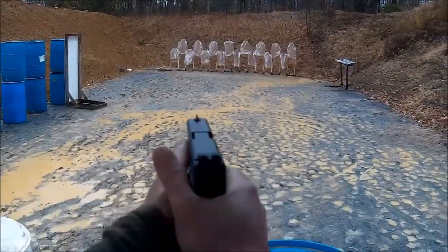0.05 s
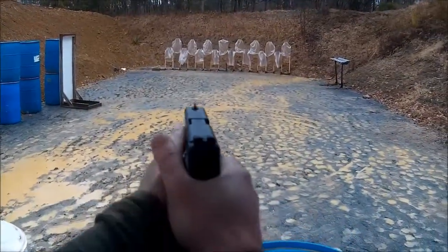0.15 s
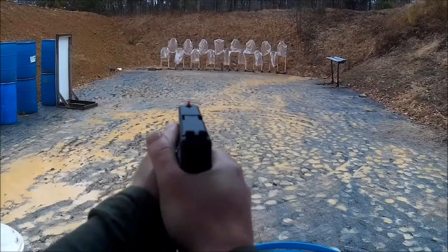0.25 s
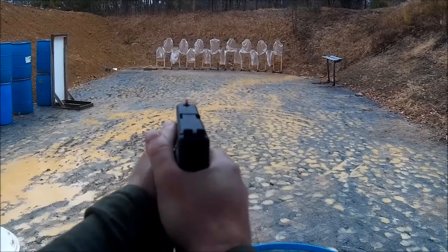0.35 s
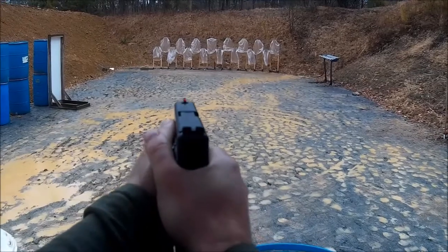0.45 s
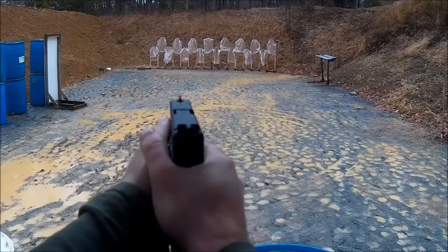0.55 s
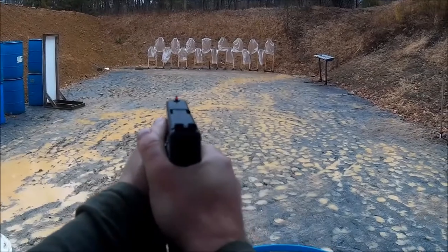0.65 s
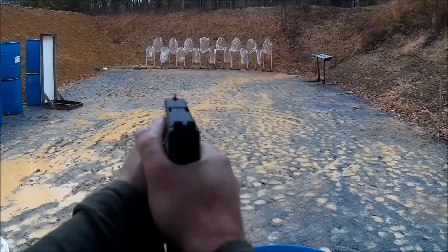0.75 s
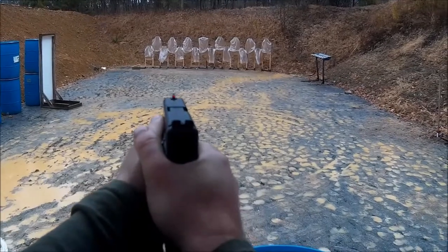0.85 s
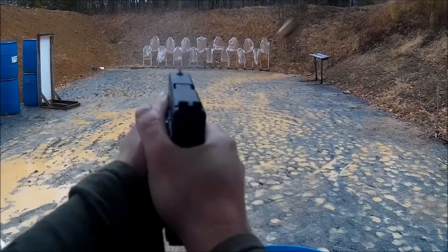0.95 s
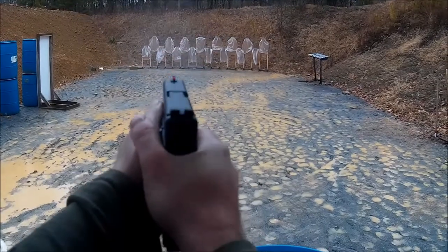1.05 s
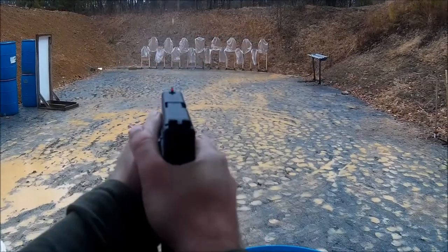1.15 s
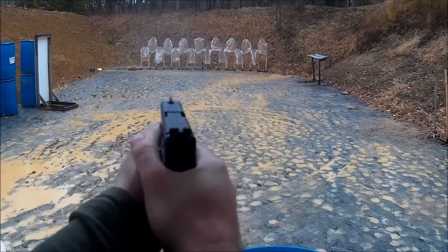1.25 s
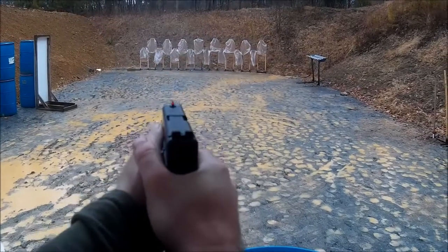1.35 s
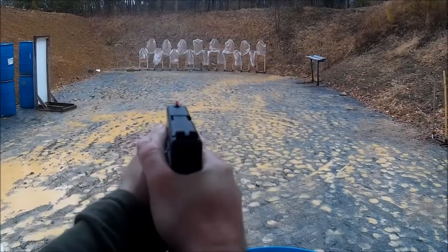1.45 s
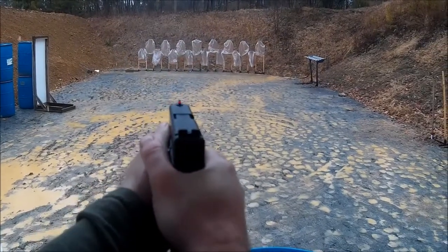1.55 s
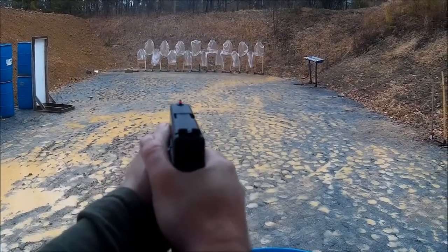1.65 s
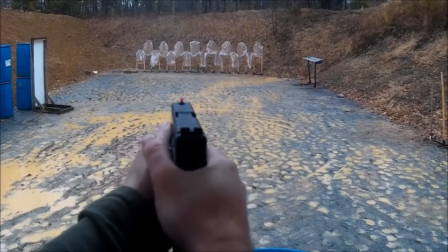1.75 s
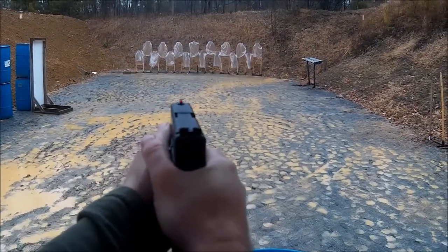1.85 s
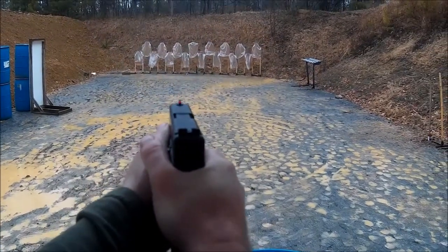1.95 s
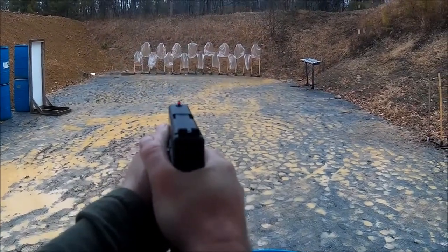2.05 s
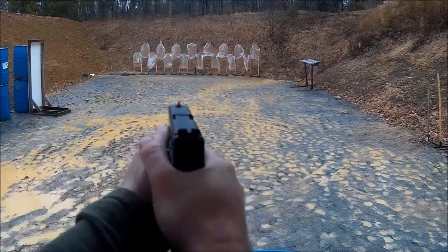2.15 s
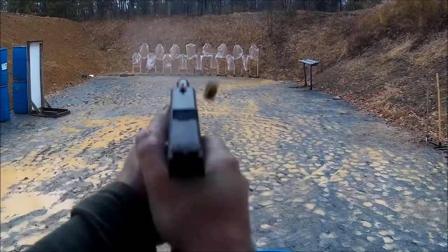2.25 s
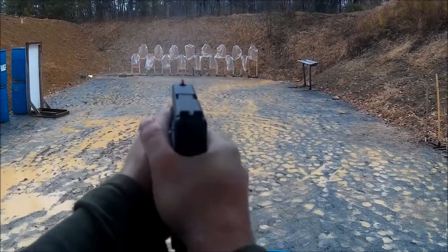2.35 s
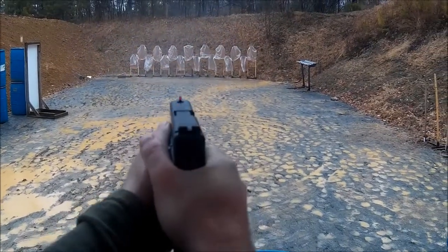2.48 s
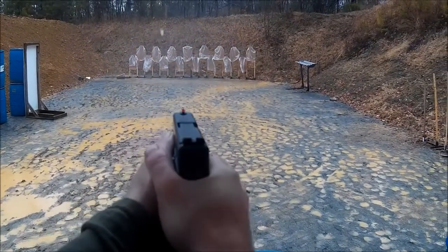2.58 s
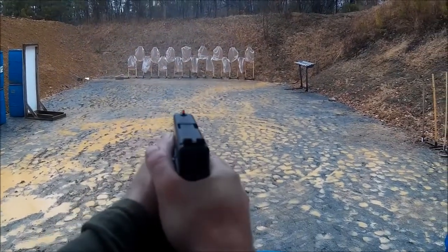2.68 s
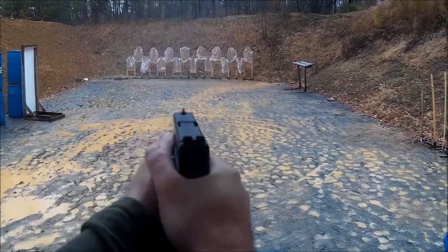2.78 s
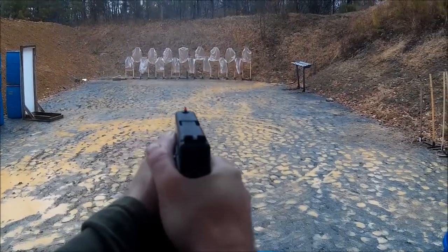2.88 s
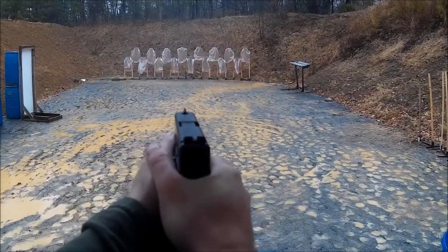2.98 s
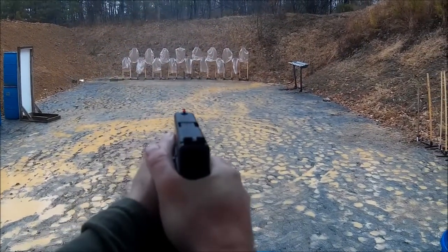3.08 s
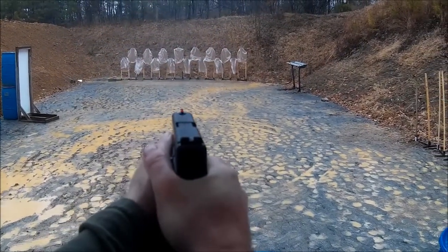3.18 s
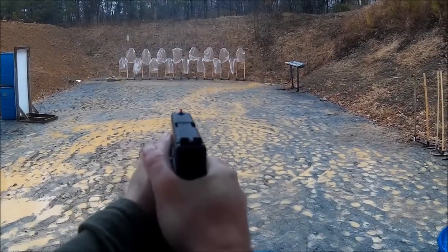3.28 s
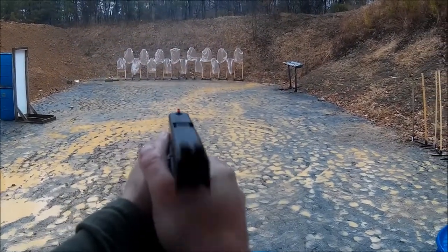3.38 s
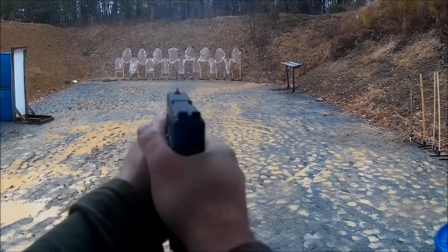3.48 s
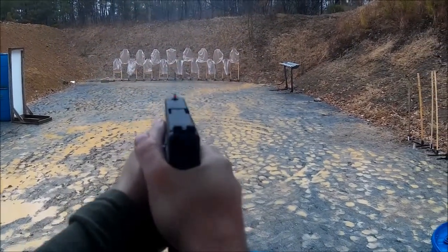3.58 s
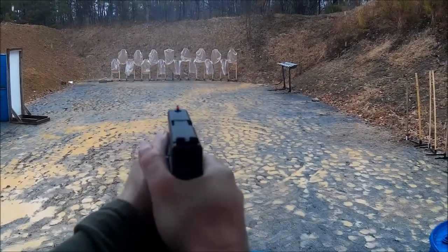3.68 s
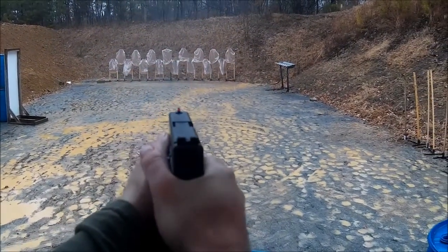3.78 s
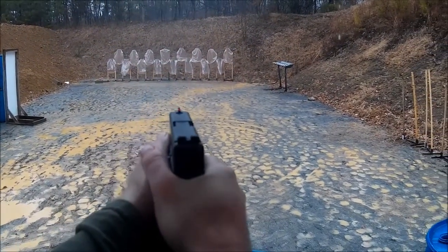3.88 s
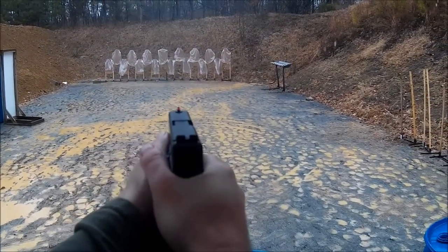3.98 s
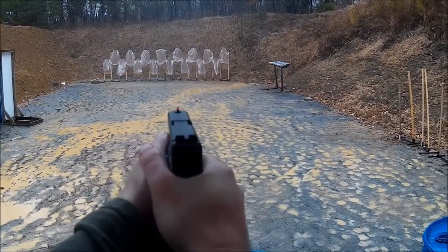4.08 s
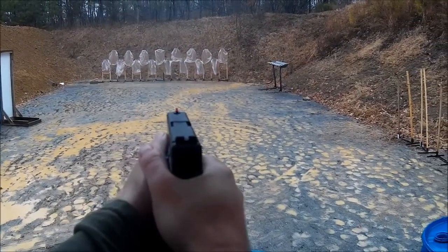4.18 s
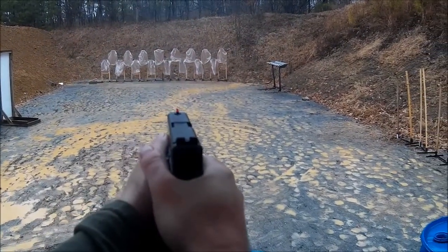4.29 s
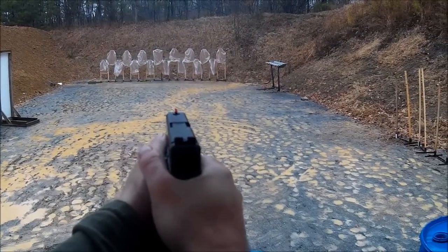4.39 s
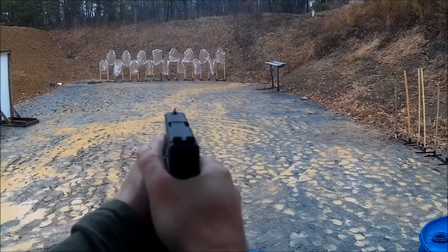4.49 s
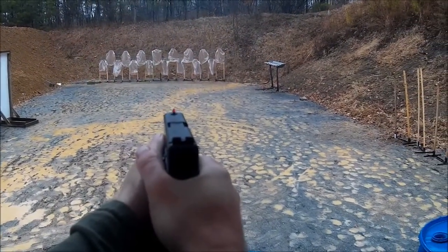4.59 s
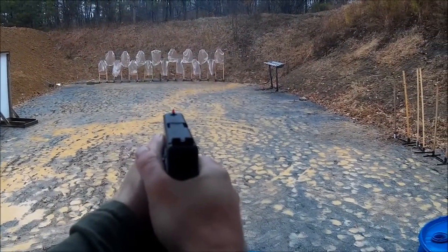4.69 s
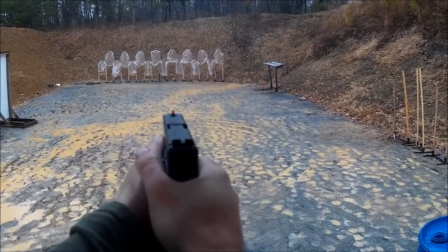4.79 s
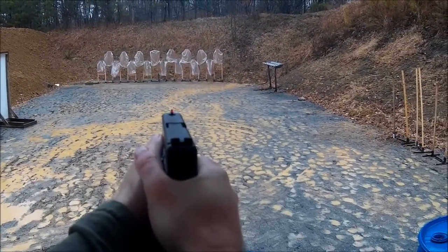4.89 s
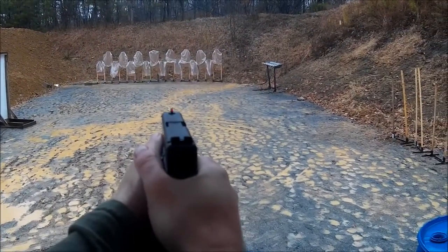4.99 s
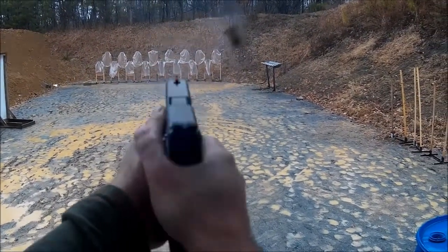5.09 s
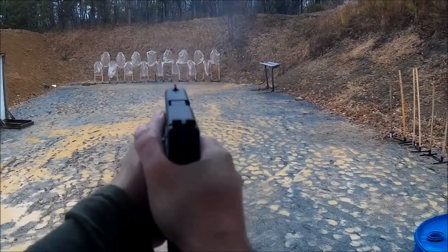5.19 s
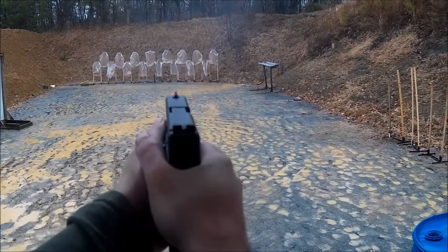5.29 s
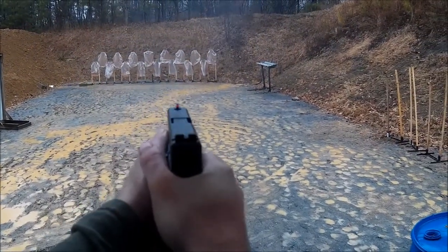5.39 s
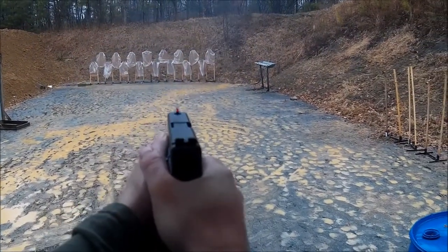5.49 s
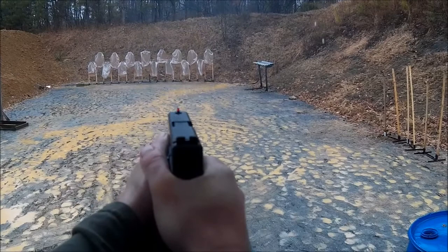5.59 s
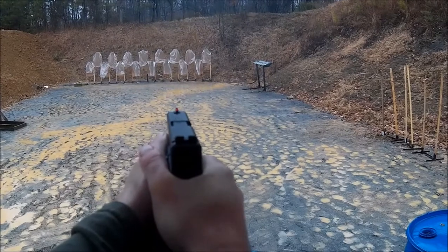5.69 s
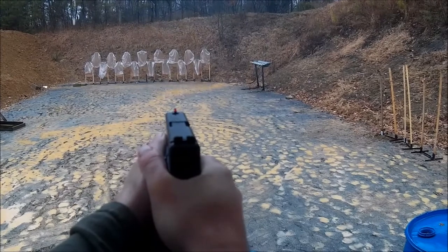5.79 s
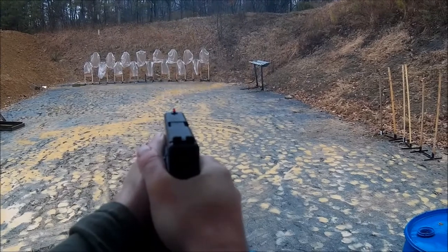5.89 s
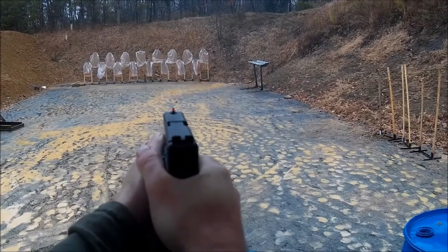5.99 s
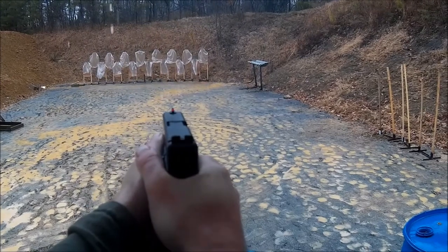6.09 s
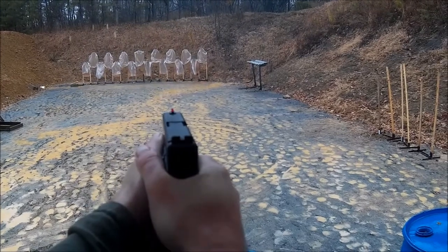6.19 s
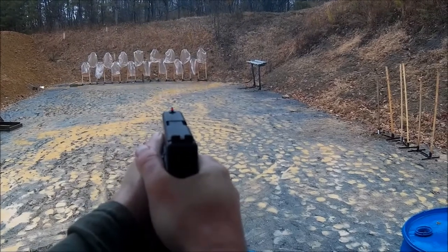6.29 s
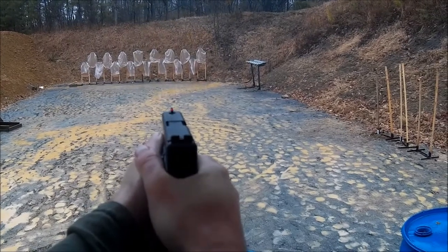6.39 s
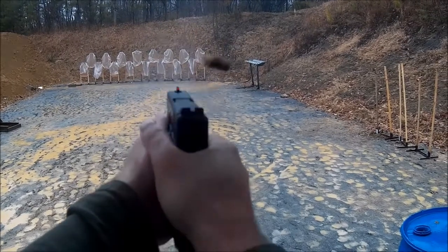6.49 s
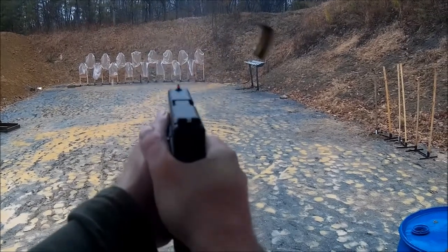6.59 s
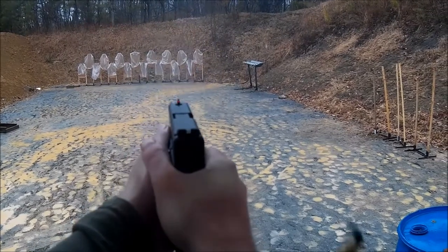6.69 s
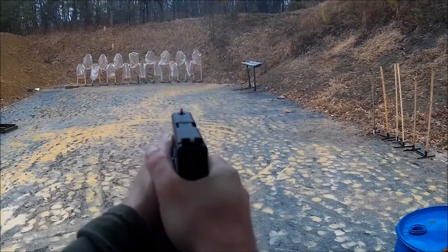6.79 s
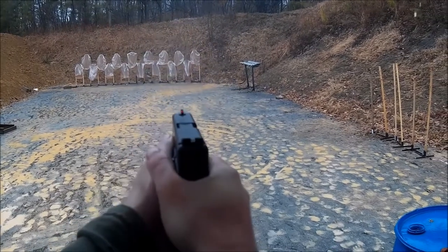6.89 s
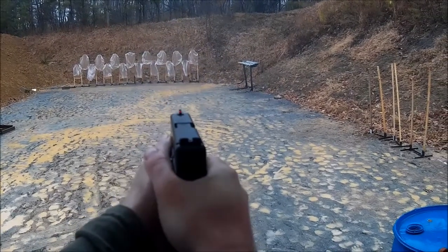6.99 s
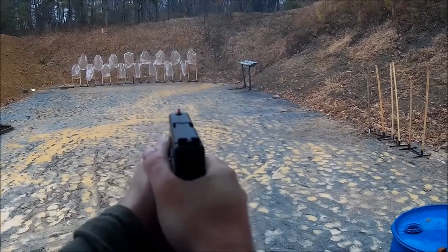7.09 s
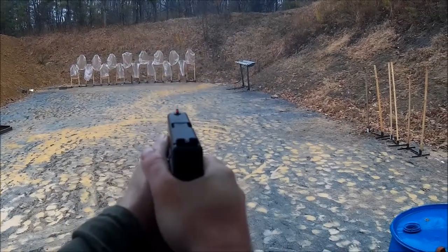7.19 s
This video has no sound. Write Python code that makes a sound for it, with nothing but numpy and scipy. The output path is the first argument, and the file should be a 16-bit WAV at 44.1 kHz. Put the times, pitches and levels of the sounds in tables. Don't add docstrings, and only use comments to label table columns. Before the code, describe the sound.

Five loud, overloaded pistol shots at an outdoor gravel range, each with rolling bank echoes, duller distant gunshots between, and spent cases clinking on stone.

```python
import sys
import numpy as np
from scipy import signal
from scipy.fft import rfft, irfft, next_fast_len
from scipy.io import wavfile
from scipy.ndimage import map_coordinates

SR = 44100
rng = np.random.default_rng(int(sys.argv[2]) if len(sys.argv) > 2 else 0)


def bounce(signal):
    frames = np.transpose(np.atleast_2d(signal))
    limited = np.clip(frames, -1, 1)
    pcm = np.round(limited * 32767).astype(np.int16)
    wavfile.write(sys.argv[1], SR, pcm)


def voltage_ratio(level):
    return 10 ** (np.asarray(level, float) / 20)


N = 319725


def unit(x):
    return x / np.sqrt(np.mean(x ** 2) + 1e-20)


def response(points, lo_hz=0, hi_hz=1e6, peaks=(), size=4096):
    hz = np.fft.rfftfreq(size, 1 / SR) + 1
    point_hz, point_db = np.transpose(points)
    db = np.interp(np.log(hz), np.log(point_hz), point_db)
    db = db + sum(gain_db / (1 + (2 * (hz - centre) / width) ** 2) for centre, width, gain_db in peaks)
    gain = voltage_ratio(db) / (1 + (lo_hz / hz) ** 6) / (1 + (hz / hi_hz) ** 6)
    cepstrum = irfft(np.log(gain + 1e-7))
    cepstrum[1:size // 2] *= 2
    cepstrum[size // 2 + 1:] = 0
    h = irfft(np.exp(rfft(cepstrum)))
    return h / np.linalg.norm(h)


def coloured(x, h):
    return signal.fftconvolve(x, h)[:len(x)]


def impulses(rows, start, length):
    s, db = np.transpose(rows)
    return np.bincount(np.round((s - start) * SR).astype(int), voltage_ratio(db), length)


def scatter(length, spiky_db, clump_db=0):
    clumps_per_s = 70
    knots = rng.standard_normal(length * clumps_per_s // SR + 4)
    clumps = map_coordinates(knots, [np.arange(length) * clumps_per_s / SR])
    sizes_db = spiky_db * rng.standard_normal(length) + clump_db * clumps
    return unit(rng.standard_normal(length) * voltage_ratio(sizes_db))


def add(track, sound, s):
    part = track[round(s * SR):][:len(sound)]
    part += sound[:len(part)]


BANDS = [1500, 4000, 8000]


def echoes(levels, ground, fresh, colour, peaks):
    total = 0
    for level, lo, hi, share in zip(levels, [0] + BANDS, BANDS + [1e6], np.clip(fresh, 0, 1)):
        crowd = np.sqrt(1 - share) * ground + np.sqrt(share) * scatter(len(ground), spiky_db=4)
        total = total + coloured(level * crowd, response(colour, lo, hi, peaks))
    return total


def tail(rows, first_s, t):
    gains = []
    for db, climb, sag, last_s, fall in rows:
        before = np.clip(first_s - t, 0, None)
        among_trees = np.clip(t, first_s, last_s) - first_s
        after = np.clip(t - last_s, 0, None)
        gains.append(voltage_ratio(db - climb * before - sag * among_trees - fall * after))
    return gains


def slaps(rows, start, t, top_hz):
    face = t[:SR // 20]
    smear = unit(scatter(len(face), spiky_db=3) * voltage_ratio(-60 * face / .04)) * voltage_ratio(-29)
    return coloured(coloured(impulses(rows, start, len(t)), smear), response(HOUSING, 190, top_hz, SHELL))


# (frequency [Hz], density [dB per Hz])
AIR = [(15, -53.5), (25, -18.5), (48, -6.5), (80, 0), (99, -9), (229, 0.5), (439, -10), (1020, -17.5),
       (1650, -27), (1840, -16.5), (3920, -35), (14000, -31.5), (16000, -37.5)]
# (frequency [Hz], density [dB per Hz])
HOUSING = [(30, -50), (150, -15.5), (215, -8), (450, 0), (800, -16), (1600, -15.5), (2600, -21),
           (4500, -31.5), (7500, -37.5), (14000, -56.5), (16000, -68.5)]
# (frequency [Hz], width [Hz], gain [dB])
SHELL = [(265.6, 120, 6), (436, 120, -8), (640, 120, 6.5), (1012.6, 280, 12.5), (1627, 99, -7.5),
         (1994, 260, 9.5), (3266, 180, 5), (6183, 1200, 6)]


def ambience():
    t = np.arange(N) / SR
    noise = rng.standard_normal((4, N))
    engine_colour = [(20, -7.0), (55, -14.5), (79, -3), (105, -10.5), (200, -13.5), (600, -120)]
    engine = voltage_ratio(-59 - 1.5 * t) * coloured(noise[0], response(engine_colour, size=16384))
    since = np.clip([t - s for s, *_ in SHOTS + NEIGHBOUR], 0, None)
    valley_rise_s, valley_t60 = 0.44, 7.9
    valley = np.clip(since / valley_rise_s, 0, 1) * voltage_ratio(-54.5 - 60 * since / valley_t60)
    earlier = voltage_ratio(-48 - 60 * t / 0.62)
    linger = np.sqrt(np.sum(valley ** 2, axis=0) + earlier ** 2)
    linger = linger * coloured(noise[1], response(HOUSING, peaks=SHELL))
    woods = voltage_ratio(-58.5) * coloured(noise[2], response(AIR, 0, 6000))
    hiss = voltage_ratio(-67) * noise[3]
    return engine + linger + woods + hiss


# (time [s], peak level [dB], treble level [dB])
TICKS = [(4.125, -29, -12), (4.224, -30, -22), (4.385, -27.5, -18), (4.403, -32.5, -2), (4.493, -27, -19),
         (4.602, -42, -12), (4.756, -39, 1), (4.845, -48, -8.5), (5.835, -31, -3), (6.012, -30, -15),
         (6.105, -34, -8), (6.183, -34, 1), (6.209, -38, -9), (6.335, -37, -12)]


def handling():
    out, t = np.zeros(N), np.arange(SR // 20) / SR
    body, edge = response(MUZZLE, 69, 1240, SHELL), response(HOUSING, 1070, 7000, SHELL)
    thud = voltage_ratio(3 - 60 * t / .04) * np.sin(2 * np.pi * 225 * t)
    for s, db, treble_db in TICKS:
        burst = rng.standard_normal(len(t)) * voltage_ratio(-60 * t / 0.026)
        knock = coloured(burst, body) + thud + voltage_ratio(treble_db) * coloured(burst, edge)
        add(out, voltage_ratio(db - 15.5) * knock, s - .001)
    rattle = np.tanh(scatter(N, spiky_db=16.5, clump_db=6) / 25) * 25 * voltage_ratio(-61.0)
    return out + coloured(rattle, response(MUZZLE, 100, 5500, SHELL))


# (time [s], thump peak level [dB], echo level [dB], ring level [dB])
NEIGHBOUR = [
    (0.1432, -10.5, 0, -12.5),
    (1.2208, -8.5, 1.5, -5),
    (1.9073, -11.5, -1, -12),
    (3.0957, -11, -1.5, -13.5),
]
# (time [s], peak level [dB])
FAR_WALLS = [
    (0.203, -22),
    (0.251, -13.5),
    (0.293, -8.5),
    (0.371, -9.5),
    (0.409, -16.5),
    (0.534, -16),
]
# (frequency [Hz], level [dB], decay time T60 [s])
THUMP = [
    (0, 10.5, 0.0031),
    (74, -12, 0.097),
    (322, 3, 0.058),
    (614, -0.5, 0.019),
]
# (frequency [Hz], density [dB per Hz])
FAR_BLAST = [(30, -35), (70, -15), (150, -14.5), (250, -5), (450, -1.5), (800, -15), (1600, -19.5),
             (2600, -23), (4500, -33), (7500, -39), (14000, -58.5), (16000, -74.5)]
# (level at first return [dB], climb to it [dB/s],
# sag among the trees [dB/s], delay of the last trees [s], fall after [dB/s])
FAR_WOODS = [
    (-33.5, 4.5, 17, 0.34, 58),
    (-39.5, 240, 34, .3, 58),
    (-45.5, 460, 55, .17, 46),
    (-58, 580, 88, .16, 50),
]


def neighbour():
    out, t = np.zeros(N), np.arange(round(1.3 * SR)) / SR
    trees = scatter(len(t), spiky_db=4.5, clump_db=0.5)
    walls = slaps(FAR_WALLS, .143, t, top_hz=900)
    far = [np.clip(t / 0.015, 0, 1) * band for band in tail(FAR_WOODS, .047, t)]
    rise_s = .0009
    modes = [voltage_ratio(db - 60 * t / t60) * np.cos(2 * np.pi * hz * (t - rise_s)) for hz, db, t60 in THUMP]
    push, boom, *rings = modes
    for s, db, echo_db, ring_db in NEIGHBOUR:
        thump = np.clip(t / rise_s, 0, 1) ** 2 * (push + boom + voltage_ratio(ring_db) * sum(rings))
        thump = coloured(thump, signal.windows.hann(33) / 16)
        answer = walls + echoes(far, trees, [.1, .3, .6, .8], FAR_BLAST, SHELL)
        add(out, voltage_ratio(db) * thump + voltage_ratio(echo_db) * answer, s)
    return out


# (time [s], peak level [dB], echo level [dB])
SHOTS = [
    (0.879, -1.5, 1.5),
    (2.229, 0, 1.5),
    (3.396, -0.5, 1),
    (5.04, -1, 1.5),
    (6.44, -2, 1.5),
]
# (time [s], peak level [dB])
WALLS = [
    (5.154, -8.5),
    (5.214, -27),
    (5.285, -50),
    (5.31, -29),
    (5.362, -22),
    (5.479, -24),
]
# (start level [dB], T60 [s], level of the slower
# part [dB], its T60 [s], share of it ending at the bay's edge [0-1])
NEAR = [
    (21.1, 0.027, -9, .3, 0.62),
    (16.5, 0.026, -13, 0.21, 0.44),
    (10.6, 0.023, -16, 0.2, .3),
    (4.6, 0.016, -17.5, 0.13, 0.085),
]
# (frequency [Hz], density [dB per Hz])
MUZZLE = [(30, -14.5), (120, -10), (220, -6), (400, -9.5), (750, -14), (1500, -12), (3000, -13.5),
          (7000, -24), (15000, -50.5)]
# (frequency [Hz], width [Hz], gain [dB])
BOUNCE = [(220, 23, 3.5), (492, 140, 13.5), (975, 230, -0.5), (1340, 130, 4.5), (1840, 190, 1),
          (364, 130, 1)]
# (delay [s], frequency [Hz], level [dB], T60 [s])
BOOM = [
    (0, 46, 3.5, 0.041),
    (.01, 9, -28, 1),
    (0.148, 105, -28, 0.15),
    (.122, 165, -32, .2),
]
# (level at first return [dB], climb to it [dB/s],
# sag among the trees [dB/s], delay of the last trees [s], fall after [dB/s])
WOODS = [
    (-31.5, 2500, -17, 0.29, 59),
    (-39.5, 1500, 6, 0.29, 58.5),
    (-44.5, 148.5, 17.5, 0.29, 66),
    (-56.5, 199, 41, 0.26, 101),
]


def pistol():
    out, t = np.zeros(N), np.arange(round(1.6 * SR)) / SR
    close = t[:SR // 4]
    gravel = scatter(len(close), spiky_db=2.5, clump_db=5)
    trees = scatter(len(t), spiky_db=4, clump_db=1.5)
    outside = 1 / (1 + np.exp(np.clip((.066 - close) / .002, -50, 50)))
    near = []
    for fast_db, fast_t60, slow_db, slow_t60, edge in NEAR:
        slow = (1 - np.clip(edge, 0, 1) * outside) * voltage_ratio(slow_db - 60 * close / slow_t60)
        near.append(voltage_ratio(fast_db - 60 * close / fast_t60) + slow)
    far = [np.clip(t / .06, 0, 1) * band for band in tail(WOODS, .114, t)]
    boom = 0
    for delay, hz, db, t60 in BOOM:
        since = np.clip(t - delay, 0, None)
        rise = 1 - np.exp(-since / (0.00052 + 0.041 * delay))
        boom = boom + voltage_ratio(db - 60 * since / t60) * np.sin(2 * np.pi * hz * since) * rise
    walls = slaps(WALLS, 5.041, t, top_hz=2980)
    lead = close[:130]
    swell = 0.3 * np.exp((lead - .003) / 0.00045) * (1 + .3 * np.sin(2 * np.pi * 4000 * lead))
    onset = np.clip(close / 0.0009, 0, 1) ** 3
    blast = 12 * (1 - close / 0.0022) * np.exp(-close / 0.0011)
    for s, db, echo_db in SHOTS:
        add(out, swell, s - .0029)
        early = echoes(near, gravel, [.4, .45, .6, .8], MUZZLE, SHELL + BOUNCE)
        add(out, voltage_ratio(db) * onset * (blast + early), s - .0002)
        late = echoes(far, trees, [.12, .3, .6, .8], HOUSING, SHELL)
        add(out, boom + voltage_ratio(echo_db) * (walls + late), s)
    return out


# (time [s], peak level [dB], low ring level [dB])
CASES = [
    (2.3591, -29, -7),
    (2.7508, -24, -8.5),
    (4.5767, -31, -9.5),
    (6.0432, -31, -9),
    (6.8, -23.5, -6.5),
]
# (frequency [Hz], level [dB], T60 [s])
BRASS = [(5940, -5.5, 0.015), (6880, -7, 0.01), (8400, -8, .008), (3870, -9, 0.008), (10200, -14, .008),
         (13200, -12, .006)]


def cases():
    out, t = np.zeros(N), np.arange(SR // 10) / SR
    contact = np.clip(t / 0.00098, 0, 1) * np.where(t < .0045, 2.5, .6)
    grit = response([(1500, -5.5), (2500, -6), (4000, -2.5), (7500, 1.5), (9500, -25.5)])
    skid_decay = 0.9 * voltage_ratio(-60 * t / 0.07) + 1.3 * voltage_ratio(-60 * t / 0.01)
    for s, db, low_db in CASES:
        ring = sum(voltage_ratio(mode_db + rng.normal(0, 4) - 60 * t / t60) * np.sin(2 * np.pi * hz * t)
                   for hz, mode_db, t60 in BRASS)
        low = voltage_ratio(low_db + 16.5 - 60 * t / 0.0116) * np.sin(2 * np.pi * 2200 * t)
        skid = coloured(scatter(len(t), spiky_db=8.5), grit) * skid_decay
        add(out, voltage_ratio(db - 16.5) * ((ring + low) * contact + skid), s - .001)
    return out


def scene():
    return (ambience() + handling() + neighbour() + pistol() + cases())[None]


def low_pass(x):
    return signal.sosfilt(signal.butter(12, 16150, fs=SR, output="sos"), x)


def record(dry):
    hot = dry / (1 + np.abs(dry / .96) ** 12) ** (1 / 12)
    hot = signal.sosfilt(signal.butter(1, 12, "high", fs=SR, output="sos"), hot)
    size = next_fast_len(N + 4096)
    hz = np.fft.rfftfreq(size, 1 / SR)
    top_hz = 15400
    lowpass = 1 / (1 + np.exp(np.clip((hz - top_hz) / 250, -50, 50)))
    hot = irfft(rfft(hot, size) * lowpass, size)[:, :N]
    return low_pass(np.clip(hot, -1, 1))


dry = scene()
out = record(dry)
bounce(out)
```